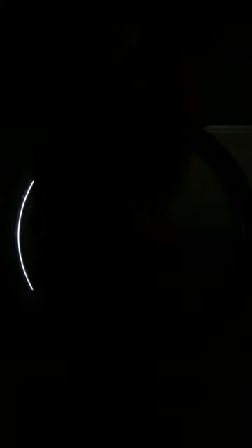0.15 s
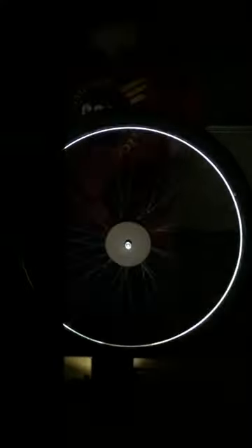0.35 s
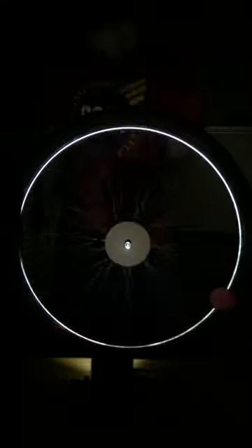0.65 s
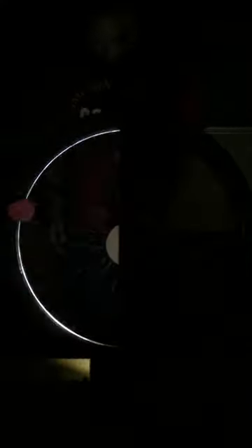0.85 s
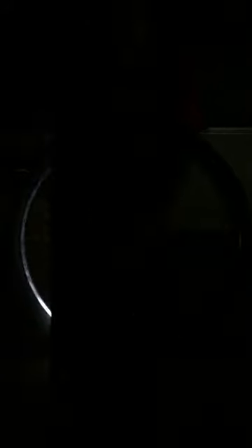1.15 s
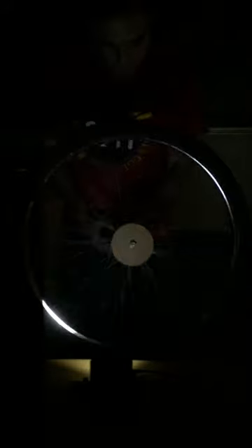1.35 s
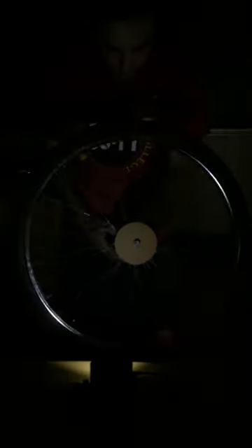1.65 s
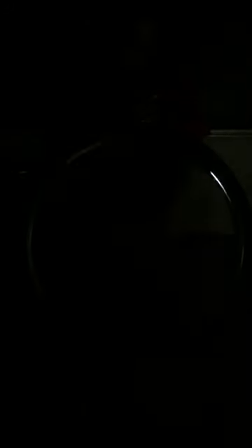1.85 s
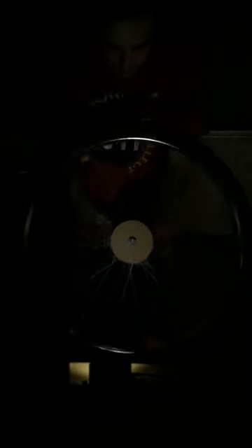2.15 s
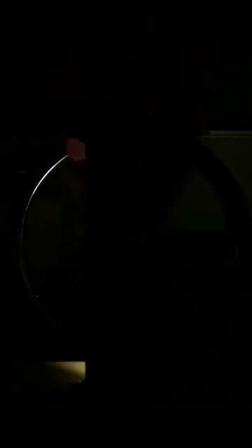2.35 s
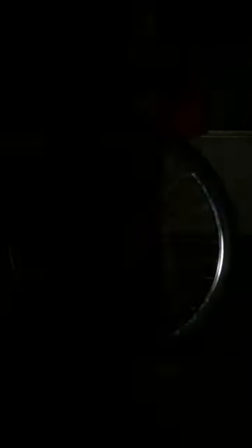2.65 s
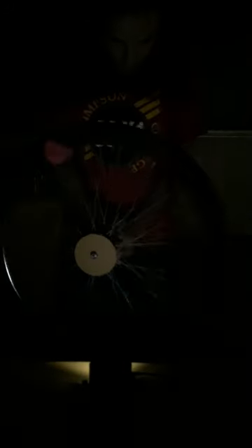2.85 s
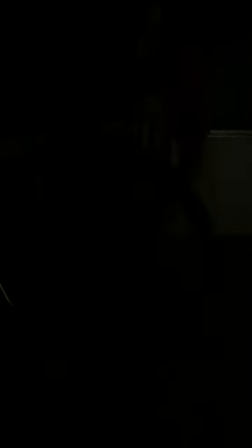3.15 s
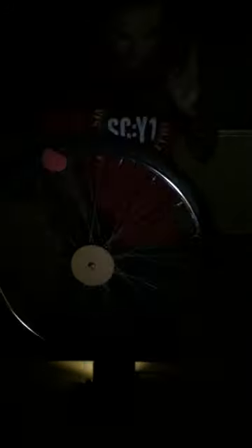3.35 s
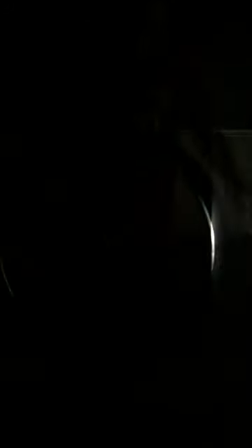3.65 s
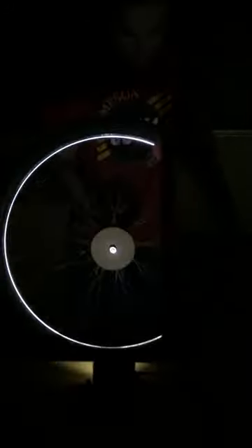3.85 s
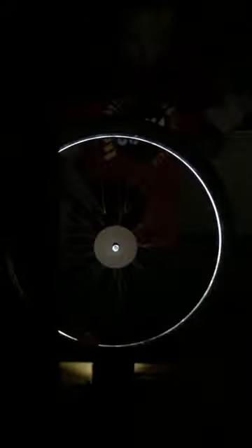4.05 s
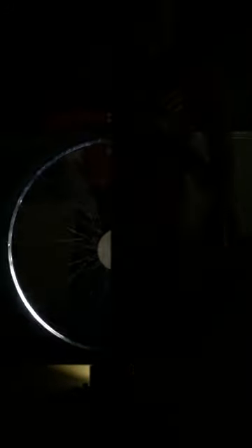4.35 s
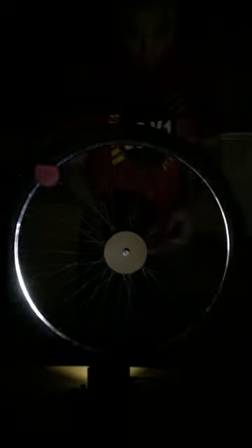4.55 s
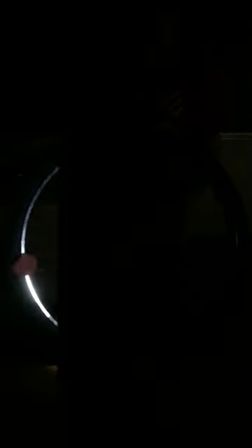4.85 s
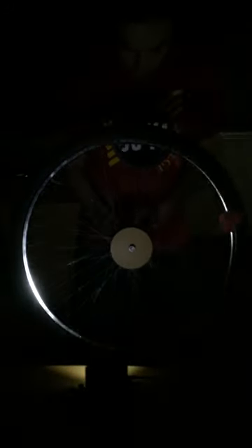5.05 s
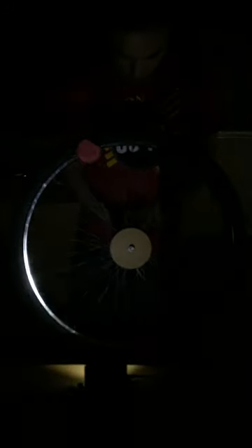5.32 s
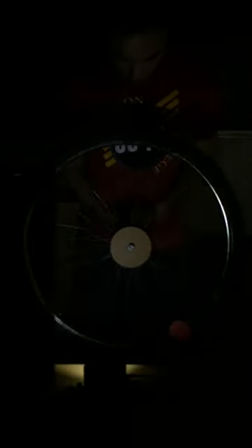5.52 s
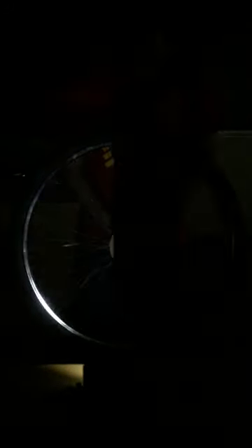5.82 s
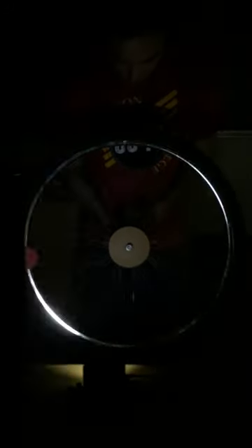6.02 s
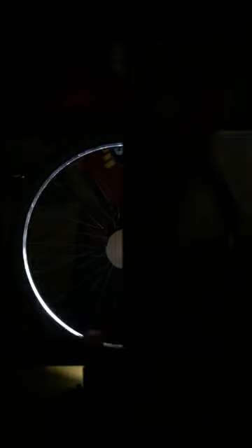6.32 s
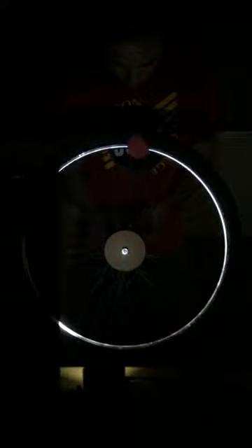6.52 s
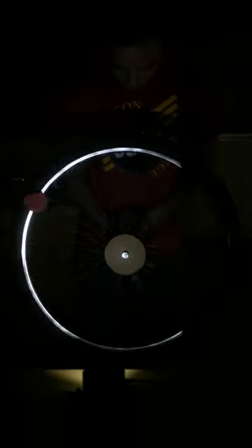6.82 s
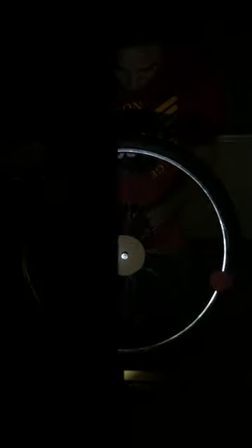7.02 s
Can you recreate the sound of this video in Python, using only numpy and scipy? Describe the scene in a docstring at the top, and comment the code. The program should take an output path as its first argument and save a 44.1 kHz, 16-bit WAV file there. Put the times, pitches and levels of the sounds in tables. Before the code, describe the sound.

Light metallic ticks and dull finger taps on a tyre in a quiet room, interrupted midway by three loud, clattering knocks.

```python
"""In a small quiet room a faint hum of sines, a thin hiss of coloured noise and very fine regular clicks
of damped modes run throughout. Fingers soon tap on the tyre of a bicycle wheel turned by hand on a stand:
dull bursts of noise. Its metal parts tick lightly, in bursts and decaying modes. Midway three sharp
knocks rattle wheel and stand, each as four quick contacts. Taps, ticks and knocks excite a diffuse echo."""
import sys
import numpy as np
from scipy import signal
from scipy.fft import rfft, irfft
from scipy.io import wavfile

SR = 44100
rng = np.random.default_rng(int(sys.argv[2]) if len(sys.argv) > 2 else 0)


def inscribe(sig):
    """Save sig as 16-bit PCM at rate SR to the path in sys.argv[1].

    A 1-D sig is mono; a 2-D sig holds one channel per row.
    Samples are clipped to [-1, 1] before scaling.
    """
    pcm = np.round(np.clip(np.atleast_2d(sig).T, -1, 1) * 32767)
    wavfile.write(sys.argv[1], SR, pcm.astype(np.int16))


N = 316638

# lower resonance group of ticking metal: f/Hz, relative spectral level/dB
TICK_LOW_SPECTRUM = [(1200, -5), (2700, -8.5), (3250, -4.5), (3680, -7), (4000, -3), (4370, 2),
                     (4850, -18.5), (5400, -4.5), (6400, -8.5), (8000, -29)]
# upper resonance group of ticking metal: f/Hz, relative spectral level/dB
TICK_HIGH_SPECTRUM = [(4500, -18.5), (6000, -11.5), (7100, -19), (7600, -8), (8200, -15), (9000, -8.5),
                      (9600, -4.5), (10400, -18.5), (11200, -18), (12500, -12.5), (14300, -17.5),
                      (14850, -5), (15500, -44)]
CUTOFF_HZ = 15400


def from_db(db):
    """Level to amplitude: 20 dB is a factor of ten."""
    return 10 ** (np.asarray(db) / 20)


def rms_one(x):
    """Normalisation of the mean power to one."""
    return x / np.sqrt(np.mean(x ** 2) + 1e-20)


def at_hz(points, hz):
    """Linear interpolation of a table along a log-frequency axis."""
    f, value = np.transpose(points)
    return np.interp(np.log(np.maximum(hz, 1)), np.log(f), value)


def noise(spectrum, size):
    """Coloured noise: a given magnitude spectrum with random phases, at unit rms."""
    hz = np.arange(size // 2 + 1) * SR / size
    phases = np.exp(2j * np.pi * rng.random(len(hz)))
    return rms_one(irfft(from_db(at_hz(spectrum, hz)) * phases, size))


def burst(spectrum, t60, size=4096):
    """High modal density: many close modes struck at once sound as exponentially decaying noise."""
    return noise(spectrum, size) * from_db(-60 * np.arange(size) / SR / t60)


def swell(x, rise_s):
    """Finite rise time: a sound builds up instead of starting at once."""
    return x * (1 - np.exp(-(np.arange(len(x)) / SR / rise_s) ** 2))


def ring(modes, size, scatter_db=5.5, rise_s=0.0016):
    """Modal superposition: exponentially damped sines, each excited with a random strength."""
    hz, db, t60 = np.transpose(modes)[:, :, None]
    t = np.arange(size) / SR
    strength = from_db(db + scatter_db * rng.standard_normal(db.shape))
    sines = strength * np.exp(-np.log(1000) * t / t60) * np.sin(2 * np.pi * hz * t)
    return swell(np.sum(sines, axis=0), rise_s)


def bell(hz, centre_hz, octaves):
    """Resonance weighting: a Gaussian of height 1 on a log-frequency axis."""
    return np.exp(-.5 * (np.log2(hz / centre_hz) / octaves) ** 2)


def struck(spectrum, bright_hz, main_hz, main_db, octaves=0.2):
    """Contact stiffness and position: a soft contact loses treble, the spot struck favours one resonance."""
    hz = np.geomspace(40, 16000, 600)
    treble_loss_db = 10 * np.log10(1 + (hz / bright_hz) ** 2)
    db = at_hz(spectrum, hz) - treble_loss_db + main_db * bell(hz, main_hz, octaves)
    return np.column_stack([hz, db])


def rippled(spectrum, ripple_db, spacing_hz=139.7):
    """Position-dependent excitation: each spot struck wakes close-lying resonances unequally."""
    hz = np.geomspace(40, 16000, 600)
    unevenness = np.interp(hz / spacing_hz, np.arange(len(hz)), rng.standard_normal(len(hz)))
    # the unevenness grows towards the treble
    db = at_hz(spectrum, hz) + ripple_db * unevenness * hz / (hz + 1500)
    return np.column_stack([hz, db])


def room(spectrum, build_s=0.0039, size=24576):
    """Diffuse reverberation: it builds up in milliseconds, then each band decays exponentially."""
    # reverberation time of the room: f/Hz, t60/s
    decay = [(120, 0.66), (400, 0.49), (1200, 0.47), (3000, 0.48), (7000, 0.32), (14000, 0.14)]
    t = np.arange(size) / SR
    hz = np.arange(size // 2 + 1) * SR / size
    field = rfft(noise(spectrum, size))
    centres = [f for f, t60 in decay]
    tail = 0
    # overlapping bands whose weights sum to one
    for (f, t60), share in zip(decay, np.eye(len(centres))):
        band = irfft(field * at_hz(list(zip(centres, share)), hz), size)
        tail = tail + band * np.exp(-np.log(1000) * t / t60)
    return swell(tail, build_s)


def add(track, s, sound):
    """Linear superposition of a sound on a track from time s."""
    start = int(np.clip(round(s * SR), 0, N - 1))
    track[start:start + len(sound)] += sound[:N - start]


def air(level_db=-55):
    """Stationary broadband noise: background air and hiss."""
    # colour of the background: f/Hz, relative spectral level/dB
    spectrum = [(15, -43), (25, -12.5), (79, -0.5), (140, 1), (221, -4), (246, -10.5), (349, -8),
                (399, -11), (433, -8), (509, -13), (1050, -15), (1140, -17), (4260, -29.5), (5010, -31.5),
                (15500, -40.5)]
    return from_db(level_db) * noise(spectrum, N)


def hum(waver=0.077):
    """Periodic radiation, perhaps of a small fan: steady sines wavering slightly in level."""
    # tones of the hum: f/Hz, nominal rms level/dB
    tones = [(215.3, -69), (430.7, -62.5), (861.3, -77), (1077, -72), (1292, -82)]
    t, knots = np.arange(N) / SR, np.linspace(0, N / SR, 50)
    out = np.zeros(N)
    for hz, db in tones:
        level = 1 + waver * np.interp(t, knots, rng.standard_normal(len(knots)))
        out += np.sqrt(2) * from_db(db) * level * np.sin(2 * np.pi * (hz * t + rng.random()))
    return out


def fine_clicks(first_s=.0077, level_db=-41.5):
    """Periodic impulses, perhaps of a small mechanism close by: dry clicks whose pace sags and picks up."""
    # pace of the clicking: t/s, rate/(clicks per s)
    pace = [(0, 23.292), (0.6, 23.103), (2.2, 22.384), (2.8, 22.284), (3.8, 21.802), (5.7, 21.799),
            (6.5, 22.185), (7.18, 22.212)]
    # ring of one click: f/Hz, relative level/dB, t60/s
    modes = [(4100, -9, .0014), (8800, -9, 0.0016), (12100, -11, 0.0025), (14300, -7, .0022)]
    out, t = np.zeros(N), np.arange(N) / SR
    # a click falls on each whole cycle of the integrated rate
    cycles = np.cumsum(np.interp(t, *np.transpose(pace))) / SR
    for s in first_s + np.interp(np.arange(int(cycles[-1]) + 1), cycles, t):
        add(out, s, from_db(level_db) * ring(modes, size=256, scatter_db=2.0, rise_s=.0001))
    return out


def taps(gain_db=5, t60=0.037, rise_s=0.00263, colour_ratio=4.1, main_db=5, echo_db=-23):
    """Soft impact: a compliant tyre gives dull pats that build up over a few milliseconds."""
    # taps on the tyre: t/s, relative level/dB, main resonance f/Hz
    pats = [(0.072, -49.5, 964), (0.217, -46.5, 1370), (.567, -50.5, 1450), (1.024, -37, 1200),
            (1.183, -37.5, 1670), (1.372, -41, 930), (1.776, -48, 985), (2.078, -46, 1640),
            (2.309, -49.5, 1460), (3.085, -42, 1600), (3.329, -43, 1540), (5.77, -43.5, 1100),
            (5.991, -42.5, 1270), (6.221, -50, 953), (7.143, -46, 923)]
    # resonances of a tap: f/Hz, relative spectral level/dB
    spectrum = [(300, -7), (680, -9), (930, 3.5), (1100, -8), (1300, -3.5), (1600, 2.5), (2050, -14.5),
                (2420, -3), (3050, -21), (3600, -16), (4800, -19.5), (9000, -25.5)]
    out = np.zeros(N)
    for s, db, hz in pats:
        colour = struck(spectrum, colour_ratio * hz, hz, main_db)
        add(out, s - rise_s / 2, from_db(db + gain_db) * swell(burst(colour, t60), rise_s))
        add(out, s, from_db(db + echo_db) * room(colour, size=8192))
    return out


def scattered(per_s):
    """Jittered point process: irregular times, one somewhere in each equal slot."""
    slots = np.arange(int(N / SR * per_s))
    return (slots + rng.random(len(slots))) / per_s


def tick(low_db, high_db, ring_hz, snap_t60=0.0068, rattle_t60=0.086, rattle_db=-13, ring_db=-8,
         focus_db=9, main_db=4, high_t60=0.057, high_rise_s=0.00067, ripple_db=7):
    """Hard light impact: a snap with a short modal ring, and a bright tinkle from higher resonances."""
    # clearest modes of the metal: f/Hz, relative level/dB, t60/s
    metal = [(3655, 4.5, 0.035), (4250, -7, 0.039), (4940, 1, 0.027), (7470, -3, 0.03)]
    colour = struck(rippled(TICK_LOW_SPECTRUM, ripple_db), CUTOFF_HZ, ring_hz, main_db, octaves=0.13)
    snap = burst(colour, snap_t60)
    rattle = from_db(rattle_db) * burst(colour, rattle_t60)
    # modes away from the ring frequency are driven less
    modes = [(hz, db + focus_db * (bell(hz, ring_hz, octaves=0.043) - 1), t60) for hz, db, t60 in metal]
    clear_ring = from_db(ring_db) * ring(modes, size=4096, scatter_db=1.5, rise_s=0.00064)
    tinkle = swell(burst(rippled(TICK_HIGH_SPECTRUM, ripple_db), high_t60), high_rise_s)
    return from_db(low_db) * (snap + rattle + clear_ring) + from_db(high_db) * tinkle


def ticks(low_gain_db=4, high_gain_db=-3.0, low_echo_db=-20, high_echo_db=-16, faint_ring_hz=4100):
    """Intermittent metal contact: clear ticks of the turning wheel, with fainter ones at random times."""
    # clear ticks: t/s, relative snap level/dB, relative tinkle level/dB, ring f/Hz
    clear = [(0.5543, -54.5, -45.5, 4300), (.646, -51, -58, 4190), (0.9993, -48.5, -45.5, 3670),
             (1.1668, -62, -46.5, 3650), (1.3215, -54, -59, 4200), (1.44, -59, -58.5, 3650),
             (1.5872, -54.5, -51, 3600), (1.7254, -55.5, -47.5, 5500), (1.7591, -47.5, -67, 3640),
             (1.9617, -59, -54, 3690), (1.98, -52, -50, 3670), (2.0578, -44.5, -62, 3720),
             (2.15, -50, -45, 3780), (2.2947, -51.5, -58, 4300), (2.4505, -39, -46, 4270),
             (2.8463, -46.5, -65, 2500), (2.979, -56, -52, 4200), (3.0025, -48, -67, 4120),
             (3.3294, -48.5, -61, 4300), (3.4698, -52, -54, 4400), (3.545, -58, -46.5, 4300),
             (4.588, -50.5, -60, 4300), (4.6723, -49, -76, 4270), (4.7247, -54, -50.5, 4300),
             (4.7582, -52.5, -59, 4410), (4.8447, -55.5, -58, 4300), (5.161, -63, -51, 4300),
             (5.431, -55.5, -46, 4300), (5.514, -50, -53, 4410), (5.791, -45, -54.5, 4060),
             (6.0678, -44.5, -51.5, 4000), (6.2038, -44, -52, 4200), (6.233, -48.5, -62, 4640),
             (6.4139, -48.5, -53, 4300), (6.575, -48.5, -50.5, 4300), (6.8677, -57, -63, 4300),
             (6.9366, -55, -56, 4300), (7.0314, -58, -53, 4300)]
    faint_per_s, faint_snap_db, faint_tinkle_db, faint_spread_db = 7.3, -53.5, -61, 3.5
    out = np.zeros(N)
    for s, low_db, high_db, ring_hz in clear:
        add(out, s, tick(low_db + low_gain_db, high_db + high_gain_db, ring_hz))
        add(out, s, from_db(low_db + low_echo_db) * room(TICK_LOW_SPECTRUM, size=8192))
        add(out, s, from_db(high_db + high_echo_db) * room(TICK_HIGH_SPECTRUM, size=8192))
    for s in scattered(faint_per_s):
        low_db, high_db = faint_spread_db * rng.standard_normal(2)
        ring_hz = faint_ring_hz * 2 ** rng.normal(0, 0.13)
        add(out, s, tick(faint_snap_db + low_db, faint_tinkle_db + high_db, ring_hz))
    return out


def contact(body, db, echo_db, bright_hz, main_hz, thud_db, thud_hz, snap_db=1, snap_t60=0.0012,
            crack_t60=0.022, main_db=8, echo_main_db=4, rim_db=-29, thud_focus_db=12):
    """Impact excitation: one hard contact gives a crack, room echo, ring of the rim and thump of the stand."""
    # low modes of the stand: f/Hz, relative level/dB, t60/s
    stand = [(87, -16, .2), (139.6, -9, 0.39), (162, -1, 0.31), (185.3, 1, 0.24), (210, -4, 0.35),
             (231.6, -2.5, 0.22), (256, -11, 0.19), (293, -15.5, 0.57)]
    # modes of rim and spokes: f/Hz, relative level/dB, t60/s
    rim = [(403, 1.5, 0.32), (580, -15, 0.11), (640, 3, 0.19), (690, -9, 0.38), (794, -23, 0.22),
           (856, -17, 0.26), (938, 3, 0.37), (998, 3, 0.19), (1090, -1, 0.26), (1350, 0.5, .3),
           (1560, -17, 0.34), (1740, -4, 0.25), (2530, -2.5, .3), (2950, -13, 0.22)]
    colour = struck(body, bright_hz, main_hz, main_db)
    crack = from_db(snap_db) * burst(colour, snap_t60) + burst(colour, crack_t60)
    echo = room(struck(body, bright_hz, main_hz, echo_main_db))
    rim_ring = ring(rim, size=18000, scatter_db=3.0)
    stand_hz, stand_db, stand_t60 = np.transpose(stand)
    # the push of a contact drives the stand modes nearest its own pitch
    driven_db = stand_db + thud_focus_db * (bell(stand_hz, thud_hz, octaves=0.32) - 1)
    thump = ring(np.column_stack([stand_hz, driven_db, stand_t60]), size=18000, scatter_db=4.5)
    return [from_db(db) * crack, from_db(db + echo_db) * echo,
            from_db(db + rim_db) * rim_ring, from_db(thud_db) * thump]


def knocks(low_cut_hz=90, ripple_db=3):
    """Repeated impact: each knock is a rattle of contacts, every one duller and deeper than the last."""
    # knocks: t/s, crack level/dB, graze and rebound ring f/Hz, blow and bounce ring f/Hz, thud level/dB,
    # thud f/Hz, blow delay t/s, rebound delay t/s, rebound crack level/dB, rebound thud level/dB
    # (levels relative, before the offsets below; thud f is that of the graze)
    blows = [(3.5720, -14.5, 573, 3140, -31.5, 203, .0007, .016, -23.5, -25.5),
             (3.9063, -16.5, 1120, 1730, -33, 185, .0022, .0415, -23, -29.5),
             (4.2335, -16.5, 1020, 790, -25, 286, .0029, .0432, -15.5, -24.5)]
    # offsets of graze, main blow, bounce, rebound: crack level/dB, echo level re crack/dB, thud level/dB
    offsets = [(-3, -11.5, -2.5), (0, -15, 4.5), (-5, -16, -0.5), (0, -21, -1.5)]
    # dense ring of wheel and stand: f/Hz, relative spectral level/dB
    spectrum = [(50, -24), (110, 0), (250, 6), (370, -2), (560, 2), (1000, 1.5), (1750, -0.5), (2150, -3.5),
                (2850, -4), (3400, -8), (4200, -6), (5200, -8), (8500, -4), (11000, -9.5), (15500, -11.5)]
    bounce_s, graze_bright_hz = .0088, 12000
    dulling, thud_sink = 0.61, .88  # brightness and thud pitch of a contact re the one before
    out = np.zeros(N)
    for s, db, outer_hz, inner_hz, thud_db, thud_hz, blow_s, rebound_s, rebound_db, rebound_thud_db in blows:
        body = rippled(spectrum, ripple_db)
        touches = [(0, db, thud_db, outer_hz),
                   (blow_s, db, thud_db, inner_hz),
                   (bounce_s, db, thud_db, inner_hz),
                   (rebound_s, rebound_db, rebound_thud_db, outer_hz)]
        for k, (touch, offset) in enumerate(zip(touches, offsets)):
            lag, hit_db, push_db, main_hz = touch
            crack_db, echo_db, weight_db = offset
            for sound in contact(body, hit_db + crack_db, echo_db, graze_bright_hz * dulling ** k, main_hz,
                                 push_db + weight_db, thud_hz * thud_sink ** k):
                add(out, s + lag, sound)
    # thin tubes and spokes radiate little deep bass
    return signal.sosfilt(signal.butter(3, low_cut_hz, "high", fs=SR, output="sos"), out)


def scene():
    """Superposition of sources: hum, hiss and fine clicking under the wheel sounds and their echo."""
    background = air() + hum() + fine_clicks()
    return (background + taps() + ticks() + knocks())[None]


def record(dry):
    """Band limitation: an elliptic low-pass cuts the top steeply."""
    return signal.sosfilt(signal.ellip(10, .1, 70, CUTOFF_HZ, fs=SR, output="sos"), dry)


dry = scene()
out = record(dry)
inscribe(out)
```